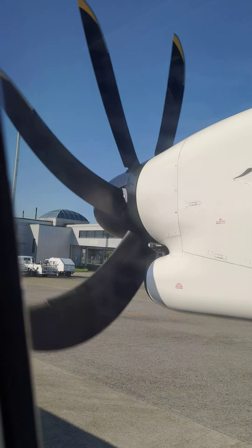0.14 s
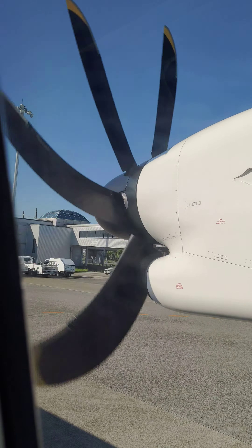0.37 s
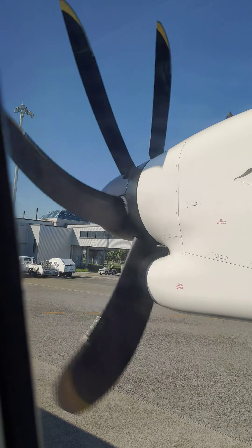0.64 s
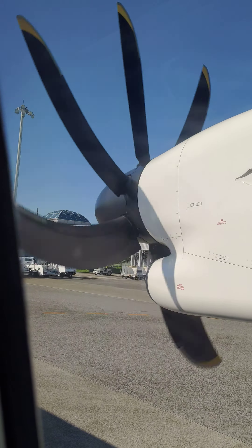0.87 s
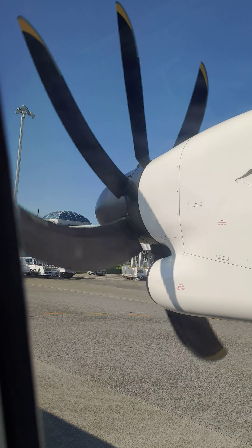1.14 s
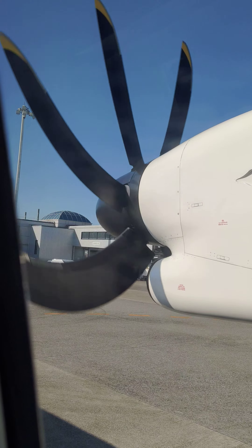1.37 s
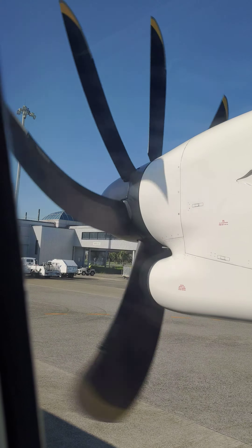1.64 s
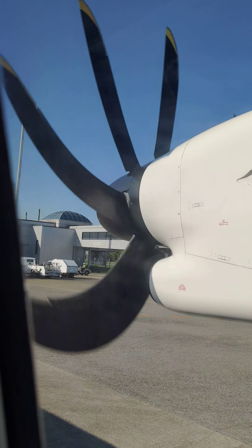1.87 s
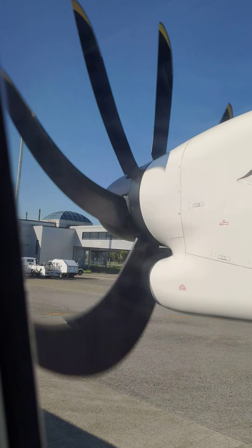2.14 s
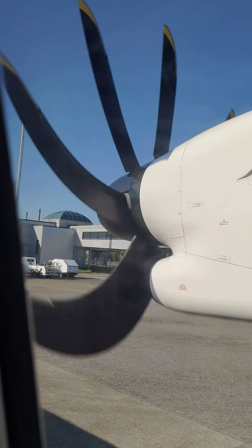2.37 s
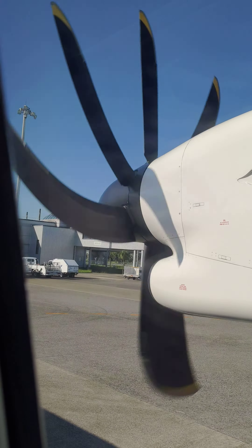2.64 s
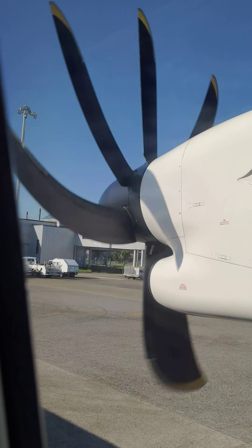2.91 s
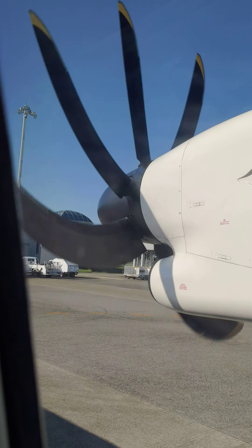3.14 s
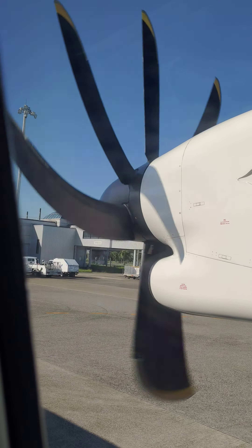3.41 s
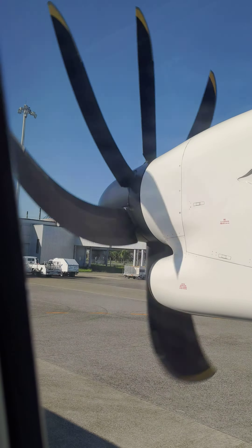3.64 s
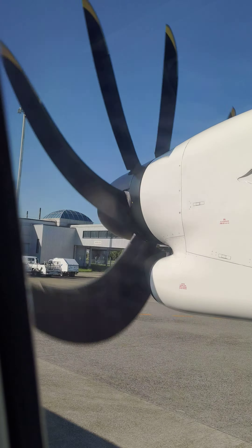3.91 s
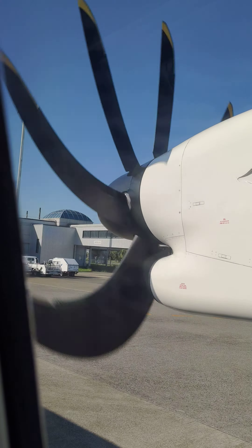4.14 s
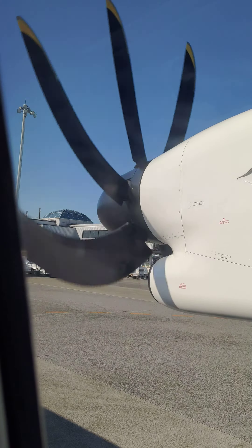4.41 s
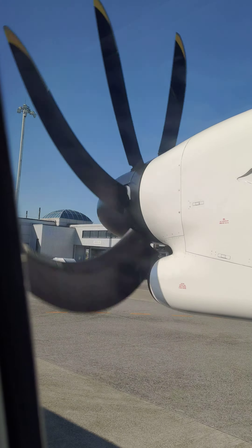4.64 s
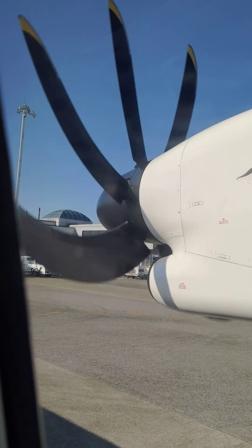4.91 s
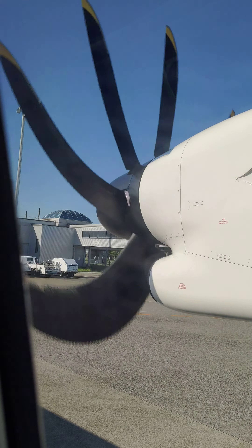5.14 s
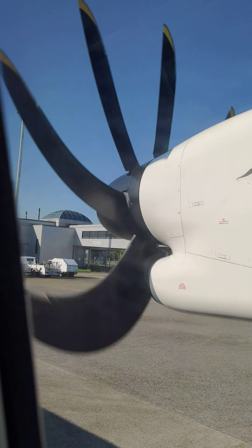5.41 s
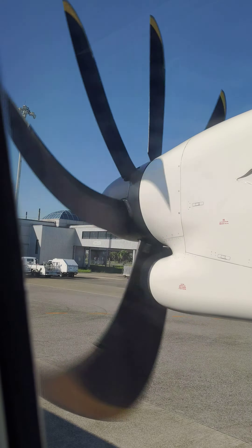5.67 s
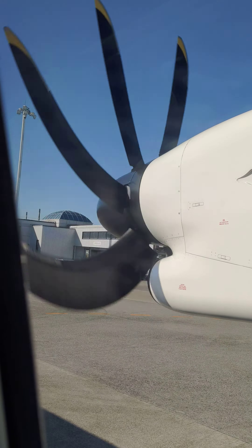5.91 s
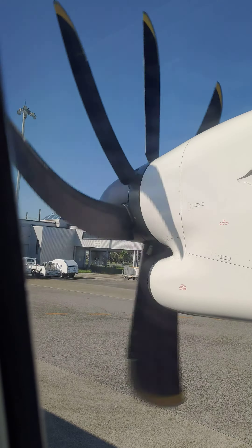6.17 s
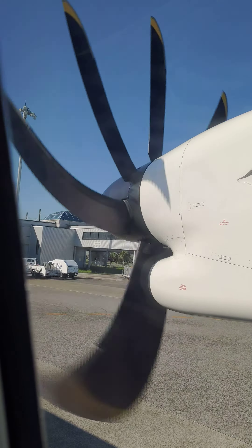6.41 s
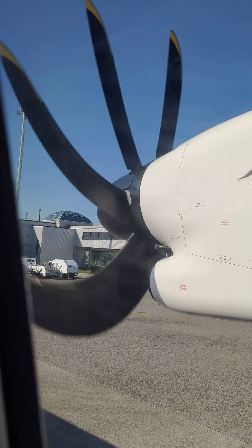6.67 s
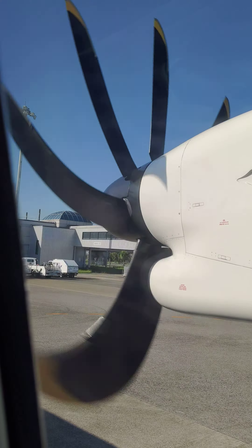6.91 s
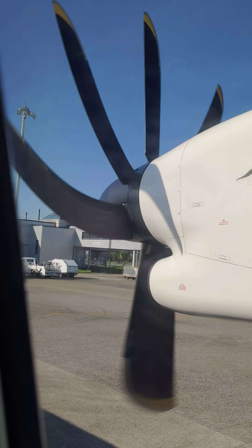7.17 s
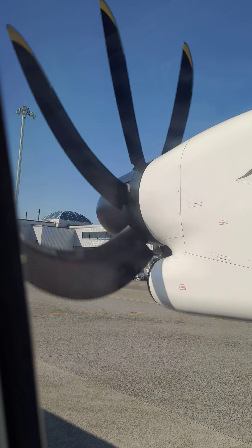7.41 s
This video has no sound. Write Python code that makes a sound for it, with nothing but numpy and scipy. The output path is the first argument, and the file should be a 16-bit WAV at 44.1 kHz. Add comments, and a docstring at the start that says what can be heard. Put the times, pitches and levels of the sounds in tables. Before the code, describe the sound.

The sound is inside a turboprop cabin beside the window, with the aircraft parked and its propeller turning outside. From 0 s there is dense low hull rumble, muffled rushing air, light hiss and one thin gear tone. The tone starts rising at once, climbing fastest from about 1 to 2 s and leveling near 3.5 s. Around 1.2 s a faint, breathy high whistle emerges, drifting slightly in pitch and weakening after 5 s. A second engine's whine becomes audible after 1.3 s, climbs mainly between 2.2 and 4.5 s, and settles close to the first. From roughly 1 s propeller throbs grow; by 2.5 to 3 s a deep boom swells unevenly beneath a rough buzz. The full drone pulses onward, with brief dips in the roar. The second whine sinks after 5 s, the first after about 6 s, and the rumble is still strong when it ends at 7.5 s.

```python
"""A hull rumble with one thin gear tone comes first, heard from a window seat in a turboprop cabin.
Both engines spool up one after the other: each gearbox is a sine gliding with shaft speed.
The propellers add throbbing harmonics of the blade rate, a low boom and a rough buzz.
Hull, rushing air, vents and intake hiss are filtered noise; the intake whistle is narrow-band noise."""
import sys
import numpy as np
from scipy import signal
from scipy.fft import rfft, irfft, next_fast_len
from scipy.io import wavfile
from scipy.ndimage import uniform_filter1d

SR = 44100
rng = np.random.default_rng(int(sys.argv[2]) if len(sys.argv) > 2 else 0)


def level_to_linear(level):
    """Convert decibel levels to linear amplitude factors, elementwise."""
    exponent = np.asarray(level, float) / 20
    return 10 ** exponent


def transcribe(u):
    """Save the signal u as a 16-bit wav file named by the first command-line argument.

    u: samples, shape (n,) or (channels, n), limited to [-1, 1]; the rate is SR.
    q: integer samples, one column per channel.
    """
    v = np.clip(np.atleast_2d(u).T, -1, 1)
    q = np.round(v * 32767).astype(np.int16)
    wavfile.write(sys.argv[1], SR, q)


N = 332514


def rms_one(x):
    """Power normalisation: scale to a root-mean-square of 1."""
    return x / np.sqrt(np.mean(np.abs(x) ** 2) + 1e-20)


def in_time(rows):
    """Linear interpolation: each column of a time table, one value a sample."""
    times, *columns = np.transpose(rows)
    return [np.interp(np.arange(N) / SR, times, column) for column in columns]


def at_hz(points, hz):
    """Logarithmic frequency scale: read a spectrum table along it."""
    table_hz, values = np.transpose(points)
    return np.interp(np.log(hz), np.log(table_hz), values)


def phase_of(hz):
    """Phase is the time integral of frequency, here in radians."""
    return 2 * np.pi * np.cumsum(hz) / SR


def smooth(x, seconds):
    """Moving average: a running mean over the given time."""
    return uniform_filter1d(x, size=max(int(seconds * SR), 1))


def swells(rows, edge_s):
    """Amplitude envelope: rectangular swells whose edges are rounded by two running means."""
    height = np.zeros(N)
    for start, length, db in rows:
        height[int(start * SR):int((start + length) * SR)] = level_to_linear(db)
    return np.sqrt(2) * smooth(smooth(height, edge_s), edge_s / 2)  # rms to sine peak


def drift(rate_hz):
    """Low-pass random process: noise through two equal poles, scaled to rms 1."""
    pole = np.exp(-2 * np.pi * rate_hz / (SR / 8))  # drawn at an eighth of the sample rate
    noise = rng.standard_normal(N // 8 + 4002)
    slow = signal.lfilter([1], [1, -2 * pole, pole * pole], noise)[4000:]  # skip the filter's start
    return np.interp(np.arange(N) / 8, np.arange(len(slow)), rms_one(slow))


def narrow_noise(phase, half_width_hz):
    """Quadrature modulation: two slow random signals spread a tone into a narrow band."""
    return drift(half_width_hz) * np.cos(phase) + drift(half_width_hz) * np.sin(phase)


# Level of the left side over the right: (frequency [Hz], level difference [dB])
SIDE_BALANCE = [(60, 1), (250, 1.5), (450, 0.5), (700, -2.5), (950, 6.5), (1150, 1.5), (1700, 3.5),
                (2200, 6), (2700, 6), (4000, 4), (6800, 9.5), (9000, 2), (11000, 13.5), (13300, 0.5)]


def sides(hz):
    """Interaural level difference: left and right gains for a sound of this pitch."""
    half_db = at_hz(SIDE_BALANCE, hz) / 2
    return level_to_linear(np.array([half_db, -half_db])).reshape(2, -1)


# Correlation of the sides before the phase lead: (frequency [Hz], correlation [-1 to 1])
SIDE_LIKENESS = [(60, .99), (170, .96), (260, .93), (345, .97), (430, .93), (480, .8), (550, .3), (620, .4),
                 (860, .43), (1000, .28), (1500, .32), (2240, .35), (3000, .2), (13600, .15)]
# Phase by which the left side leads: (frequency [Hz], lead [rad])
SIDE_LEAD = [(60, 0), (260, .1), (345, .3), (430, .5), (520, .5), (600, 2.6), (1000, 2.7), (1120, 3.6),
             (1500, 3.6), (1720, 5.7), (2240, 8.0), (3000, 7.4), (13600, 19)]
# Early echoes off window, seat back and bins: (left delay [ms], right delay [ms], level [dB])
EARLY_ECHOES = [(2.8, 3.3, -17), (5.3, 4.7, -18), (9.1, 10.3, -21), (15.7, 14.1, -21)]
# Resonances of cabin and window: (frequency [Hz], width [Hz], boost [dB])
CABIN_RESONANCES = [(156, 36, 0), (344.6, 22, 8.5), (418.4, 34.5, 6), (831, 51, 4), (1145, 46, 4.5),
                    (1382, 24, 8), (1670, 120, 1), (2570, 160, -2.5), (5100, 230, 1.5), (6890, 180, 4.5),
                    (11700, 600, 2), (13000, 600, 4)]


def stereo_noise(spectrum):
    """Partial coherence: filtered noise with resonances and echo ripple; rms 1 in the side average."""
    size = next_fast_len(N)
    hz = np.maximum(np.arange(size // 2 + 1) * SR / size, 1)
    mid, side = rfft(rng.standard_normal((2, size)))
    alike = np.clip(at_hz(SIDE_LIKENESS, hz), -1, 1)
    pair = np.sqrt(1 + alike) * mid + np.sqrt(1 - alike) * side * [[1], [-1]]
    pair[0] *= np.exp(1j * at_hz(SIDE_LEAD, hz))
    echoes = 1
    for left_ms, right_ms, db in EARLY_ECHOES:
        delays_s = np.array([left_ms, right_ms]) / 1000
        echoes = echoes + level_to_linear(db) * np.exp(-2j * np.pi * np.outer(delays_s, hz))
    # Long waves pass round the seats: the ripple fades in from 500 to 1500 Hz
    ripple = 1 + (np.abs(echoes) - 1) * np.clip(hz / 1000 - .5, 0, 1)
    peaks_db = sum(db / (1 + (2 * (hz - centre) / width) ** 2) for centre, width, db in CABIN_RESONANCES)
    colour = level_to_linear(at_hz(spectrum, hz) + peaks_db)
    out = irfft(pair * ripple * sides(hz) * colour, size)[:, :N]
    return out / np.std(out.mean(axis=0))


# Vent noise spectrum: (frequency [Hz], relative density [dB per Hz])
VENT_SPECTRUM = [(1000, -41.5), (1700, -12), (2000, -4), (2700, -4), (2950, -15.5), (3600, -19),
                 (6000, -56.5)]


def vents(power_db, flicker_db):
    """Turbulent jet noise: a hiss that moves by a quarter of the engine's swing, inversely."""
    return level_to_linear(-59.5 - 0.25 * power_db + flicker_db) * stereo_noise(VENT_SPECTRUM)


# Air rush spectrum: (frequency [Hz], relative density [dB per Hz])
RUSH_SPECTRUM = [(290, -31.5), (500, -5), (650, -10.5), (1000, -18), (1300, -20), (1800, -23.5),
                 (2300, -37.5), (4000, -46), (8000, -100)]


def rush(power_db, flicker_db):
    """Broadband flow noise: rushing air follows 0.6 of the engine's swing in dB."""
    return level_to_linear(-41.5 + 0.6 * power_db + flicker_db) * stereo_noise(RUSH_SPECTRUM)


# Air drawn by the near engine, as hiss: (time [s], level [dB])
INTAKE_AIR = [(0, -63.5), (.6, -62), (1.2, -60), (2, -59), (3.4, -58.5), (5, -58.5), (6, -59),
              (7.54, -60.5)]
# Hiss spectrum: (frequency [Hz], relative density [dB per Hz])
HISS_SPECTRUM = [(1760, -30), (3000, -3), (4000, -3), (5000, -4.5), (6400, -7), (8300, -7.5), (9600, -12.5),
                 (10500, -16), (13200, -18), (13600, -16), (14200, -24)]


def intake_hiss(flicker_db):
    """Turbulent inflow: high broadband noise from the air drawn by the near engine."""
    return level_to_linear(in_time(INTAKE_AIR)[0] + flicker_db) * stereo_noise(HISS_SPECTRUM)


# Engine power, which drives hull, rush and vents: (time [s], level against full [dB])
ENGINE_POWER = [(0, -3), (0.7, -4.5), (1.2, -4), (1.7, -2), (2.3, 0), (3.3, -1.1), (4.1, 0.25),
                (5.2, -0.16), (6.2, -0.16), (7.1, -2.5), (7.54, 1.2)]


def engine_power():
    """Source strength: the engine's power as a level curve in dB."""
    return in_time(ENGINE_POWER)[0]


# Brief dips of the low roar: (centre time [s], length [s], depth [dB])
ROAR_DIPS = [(0.618, 0.042, -4), (1.63, 0.074, -5), (2.51, 0.1, -3), (3.18, 0.041, -1),
             (4.248, 0.078, -3.5), (6.252, .05, -2.5), (7.177, .2, -1)]


def roar_dips():
    """Gaussian level modulation: the low roar dips briefly, in dB."""
    t = np.arange(N) / SR
    return sum(db * np.exp(-4 * ((t - centre) / length) ** 2) for centre, length, db in ROAR_DIPS)


# Hull rumble spectrum: (frequency [Hz], relative density [dB per Hz])
HULL_SPECTRUM = [(12, -50), (25, -29), (60, -4.5), (100, -8.5), (134, 1), (237, -5), (300, -5.5),
                 (440, -8.5), (520, -20), (600, -19.5), (1000, -34.5), (1300, -65), (2200, -120)]


def hull(rumble_db):
    """Structure-borne sound: low noise coloured by the cabin resonances."""
    return level_to_linear(rumble_db) * stereo_noise(HULL_SPECTRUM)


# Whistle, lower band before echo and side balance: (time [s], frequency [Hz], level [dB])
WHISTLE_GLIDE = [(0, 4304, -85), (1.0, 4440, -82), (1.2, 4460, -70), (1.4, 4680, -66), (1.6, 4800, -64),
                 (1.9, 4880, -66), (2.4, 4880, -64.5), (3, 4836, -65.5), (3.6, 4750, -65), (4.2, 4770, -65),
                 (4.7, 4670, -66), (5.3, 4560, -71), (6, 4630, -74), (7.54, 4530, -76)]


def intake_whistle():
    """Comb filtering: an echo off the wing splits two close noise bands into strands."""
    half_width_hz, upper_offset_hz, upper_db = 140, 329, -4
    echo_ms, echo_db = 14.0, -3.5
    hz, level_db = in_time(WHISTLE_GLIDE)
    lower, upper = phase_of(hz), phase_of(hz + upper_offset_hz)
    pair = []
    for _ in range(2):  # each side has its own noise
        upper_band = level_to_linear(upper_db) * narrow_noise(upper, half_width_hz)
        pair.append(narrow_noise(lower, half_width_hz) + upper_band)
    pair = np.array(pair)
    pair += level_to_linear(echo_db) * np.roll(pair, round(echo_ms * SR / 1000), axis=1)
    return level_to_linear(level_db) * sides(4800) * pair


# Gear tone of each engine before smoothing: (time [s], frequency [Hz])
NEAR_GLIDE = [(0, 472), (0.4, 482), (0.75, 504), (1.15, 536), (1.45, 570), (1.75, 608), (2.05, 634),
              (2.5, 661), (2.9, 675), (3.4, 685.5), (3.9, 687.5), (5.1, 687.5), (5.75, 689.5), (6.4, 683.8),
              (7.54, 665.4)]
FAR_GLIDE = [(0, 460), (1.2, 467), (1.85, 474), (2.2, 487), (2.6, 511), (3.0, 550), (3.4, 596), (3.75, 631),
             (4.1, 656), (4.45, 672.5), (4.8, 682), (5.1, 678), (6.1, 659), (7.54, 624)]
# Load on each gearbox, as tone level before the seat gains: (time [s], level [dB])
NEAR_GEAR_LOAD = [(0, -35), (.7, -38), (1.1, -40), (1.3, -36), (1.55, -42), (1.8, -42), (2.1, -37.5),
                  (2.4, -48.5), (2.7, -40), (3.2, -44.5), (4.4, -45.5), (5.0, -46), (5.9, -41.5),
                  (6.35, -45), (6.7, -34), (7.1, -38), (7.54, -37)]
FAR_GEAR_LOAD = [(1.0, -68), (1.3, -43), (2.0, -38), (2.4, -38.5), (2.8, -52), (3.2, -38.5), (3.6, -50),
                 (3.9, -44), (4.25, -35), (4.5, -35.5), (4.85, -38), (5.1, -46), (5.5, -41), (5.95, -42),
                 (6.1, -48), (6.4, -45), (6.8, -41.5), (7.1, -37), (7.54, -40)]
# Standing waves at the seat, one column a list: (frequency [Hz]), (lead of the left side [rad]),
# (left gain [dB]), (right gain [dB])
STANDING_HZ = [460, 480, 500, 524, 536, 550, 566, 582, 602, 620, 634, 644, 654, 664, 672, 680, 690]
STANDING_LEAD = [.1, .2, 1, 1.8, 1.5, .6, .8, 1, 1.6, 2.9, 3, 2.9, 4.3, 8.4, 8.2, 7.4, 6.5]
STANDING_LEFT_DB = [2, -1.5, -3.5, -5, -8, 2.5, -5, -10, 2, -5, 6, 4, -5.5, -7.5, -1.5, -9, -3.5]
STANDING_RIGHT_DB = [-2, -5, 2, 2.5, -4, 3, 0, -1, 0, -5, 4, -2, -7.5, 3.5, 2, -4, -10.5]


def gearbox(glide, load):
    """Standing waves: a tone gliding with shaft speed meets different gains and phase at each side."""
    hz = smooth(in_time(glide)[0], 0.15)
    load_db = in_time(load)[0] + 0.55 * drift(3.0)
    left_db = np.interp(hz, STANDING_HZ, STANDING_LEFT_DB)
    right_db = np.interp(hz, STANDING_HZ, STANDING_RIGHT_DB)
    lead = np.interp(hz, STANDING_HZ, STANDING_LEAD)
    phase = phase_of(hz) + 0.15 * drift(3.2)  # phase wander in rad
    pair = np.array([level_to_linear(left_db) * np.sin(phase + lead), level_to_linear(right_db) * np.sin(phase)])
    return np.sqrt(2) * level_to_linear(load_db) * pair


# Boom between its swells, before side balance: (time [s], peak level [dB])
BOOM_LEVEL = [(0, -50), (1.6, -47), (2.1, -36), (2.8, -31), (4, -27), (5, -31.5), (6.1, -35), (7.54, -31.5)]
# Swells of the boom, before trim and smoothing: (start [s], length [s], level [dB])
BOOM_SWELL_ROWS = [(2.763, 0.06, -22.5), (2.88, 0.03, -23), (3.501, 0.076, -22.5), (3.617, 0.076, -26),
                   (3.752, 0.034, -24), (3.986, 0.17, -23), (4.339, 0.085, -21), (4.705, 0.096, -21.5),
                   (4.932, 0.085, -23), (5.042, 0.31, -21.5), (5.808, 0.28, -24), (6.275, 0.156, -20.5),
                   (6.63, 0.062, -21.5), (6.738, 0.07, -21), (6.835, 0.14, -22), (7.352, 0.146, -20)]


def boom():
    """Modal resonance: the lowest cabin mode, a wandering sine near 70 Hz that swells unevenly."""
    steady = level_to_linear(in_time(BOOM_LEVEL)[0] + 2.0 * drift(7.6))
    height = np.maximum(steady, level_to_linear(-1.3) * swells(BOOM_SWELL_ROWS, 0.034))
    return height * np.sin(phase_of(70.3 + 1.1 * drift(1.976)))


# Propeller drone between throbs, before dips and side balance:
# (time [s], blade rate [Hz], 2nd harmonic peak level [dB], 3rd harmonic peak level [dB])
BLADE_DRONE = [(0, 44.76, -58, -34), (0.6, 46.8, -41, -32), (0.9, 50.03, -34, -28), (1.25, 54, -35, -26),
               (1.45, 57.56, -32.5, -25.5), (1.8, 61.49, -31, -34), (2.2, 66, -33, -26),
               (3, 66.82, -33, -36), (4.5, 67.72, -30, -26), (5.3, 67.47, -29.5, -29.5),
               (6.5, 67.05, -31, -29.5), (7.0, 63.75, -27.5, -31), (7.54, 60.87, -26, -37)]
# Uneven throbs, a list for the 2nd and one for the 3rd harmonic, before trim and smoothing:
# (start [s], length [s], level [dB])
BLADE_THROBS = [
    [(0.955, 0.033, -25), (1.412, 0.03, -18), (1.733, 0.03, -18.5), (2.126, 0.052, -20),
     (2.256, 0.034, -34), (2.362, 0.094, -16), (2.547, 0.048, -17), (2.749, 0.14, -22), (2.964, 0.13, -25),
     (3.453, 0.048, -23), (3.832, 0.11, -21.5), (3.944, 0.099, -21.5), (4.114, 0.033, -23),
     (4.305, 0.05, -18.5), (4.395, 0.166, -18.5), (4.664, 0.041, -20), (4.726, 0.06, -18.5),
     (5.125, 0.068, -26), (5.303, 0.04, -19.5), (5.407, 0.034, -25), (5.578, 0.1, -20.5),
     (5.772, 0.038, -27), (5.953, 0.05, -17.5), (6.057, 0.038, -18), (6.299, 0.039, -17.5),
     (6.355, 0.036, -28), (6.484, 0.046, -19.5), (6.582, 0.05, -17.5), (6.664, 0.042, -19),
     (6.903, 0.033, -22), (7.251, 0.041, -23), (7.328, 0.162, -23.5)],
    [(1.665, 0.076, -20), (2.208, 0.034, -20), (2.3, 0.054, -18.5), (2.441, 0.042, -22),
     (2.944, 0.058, -23), (3.302, 0.038, -19), (3.415, 0.042, -20), (3.499, 0.049, -18),
     (3.561, 0.034, -23), (3.649, 0.035, -15.5), (3.874, 0.077, -19), (4.064, 0.038, -26),
     (4.118, 0.076, -19), (4.477, 0.039, -16.5), (4.573, 0.042, -17.5), (4.648, 0.045, -19.5),
     (4.714, 0.19, -21), (4.986, 0.066, -18.5), (5.095, 0.05, -21), (5.301, 0.046, -18.5),
     (6.41, 0.051, -19.5), (7.221, 0.031, -23), (7.324, 0.037, -21)],
]
# One swell of the 3rd harmonic at the cabin resonance near 155 Hz, before smoothing:
# (start [s], length [s], level [dB])
RESONANT_THROB = (0.93, 0.11, -25.5)
# Rough upper harmonics: (multiple of blade rate, relative level [dB], half-width at -6 dB [Hz])
ROUGH_HARMONICS = [(4, -9, 15), (5, -11, 13.7), (6, -12.5, 13.5)]


def propellers(rumble_db, dips):
    """Blade-passing harmonics: two firm ones with the boom, rougher ones above from turbulent inflow."""
    edge_s = 0.039
    hz, *levels_db = in_time(BLADE_DRONE)
    phase = phase_of(hz)
    drone = swells([RESONANT_THROB], edge_s) * np.sin(3 * phase)
    for harmonic, db, rows in zip((2, 3), levels_db, BLADE_THROBS):
        steady = dips * level_to_linear(db + 2.9 * drift(6.1))
        height = np.maximum(steady, level_to_linear(-2.5) * swells(rows, edge_s))
        drone = drone + height * np.sin(harmonic * phase + 0.79 * drift(7.3))
    buzz = 0
    for multiple, db, half_width_hz in ROUGH_HARMONICS:
        buzz = buzz + level_to_linear(rumble_db + db) * narrow_noise(multiple * phase, half_width_hz)
    return (boom() + drone) * sides(100) + buzz * sides(330)


def scene():
    """Superposition: air noise, hull, whistle, gear tones and propellers add linearly."""
    power_db, dips_db = engine_power(), roar_dips()
    flicker_db = 0.65 * drift(15.0)  # turbulence shakes rush, vents and hiss together
    rumble_db = -20.5 + power_db + dips_db + 0.3 * drift(3.0)  # the last term buffets the hull
    air = vents(power_db, flicker_db) + rush(power_db, flicker_db) + intake_hiss(flicker_db)
    gears = gearbox(NEAR_GLIDE, NEAR_GEAR_LOAD) + gearbox(FAR_GLIDE, FAR_GEAR_LOAD)
    blades = propellers(rumble_db - 1.5, level_to_linear(dips_db))
    return air + hull(rumble_db) + intake_whistle() + gears + blades


def low_pass(x):
    """Removes everything above the highest recorded frequency."""
    return signal.sosfilt(signal.butter(12, 14190, fs=SR, output="sos"), x)


def record(dry):
    """Linear superposition is complete: the finished mix is passed on at its own level."""
    return low_pass(dry)


dry = scene()
out = record(dry)
transcribe(out)
```